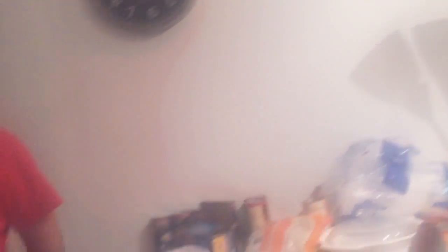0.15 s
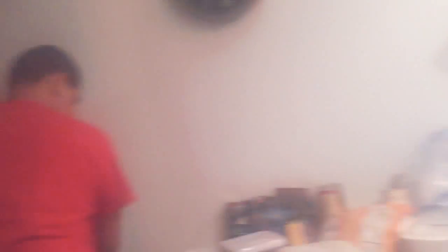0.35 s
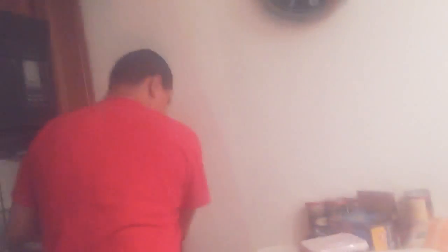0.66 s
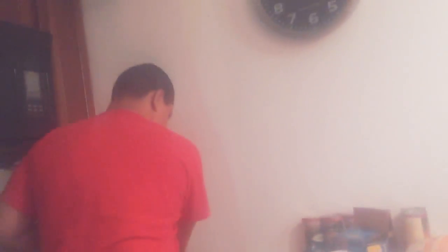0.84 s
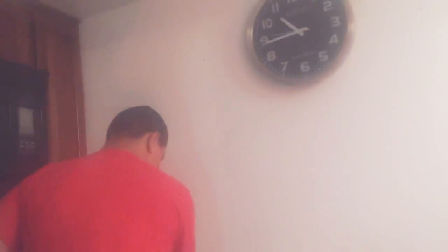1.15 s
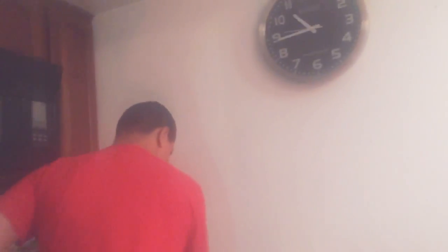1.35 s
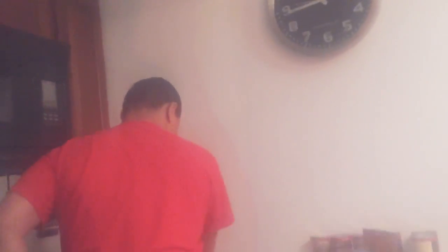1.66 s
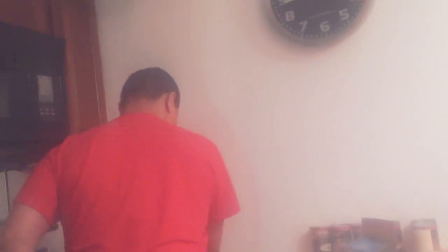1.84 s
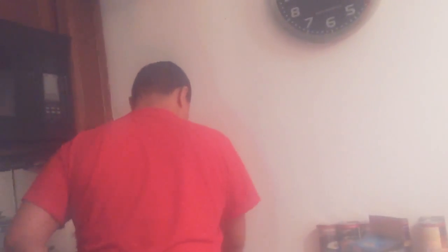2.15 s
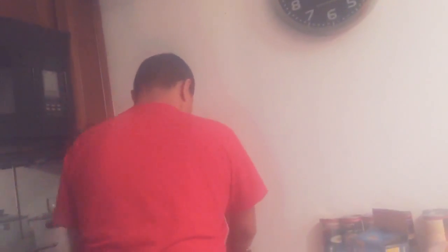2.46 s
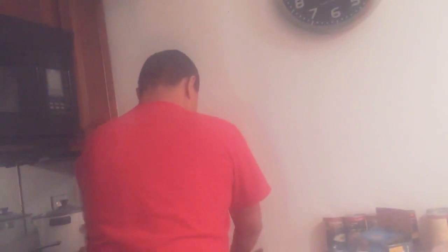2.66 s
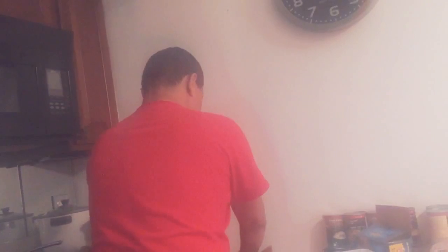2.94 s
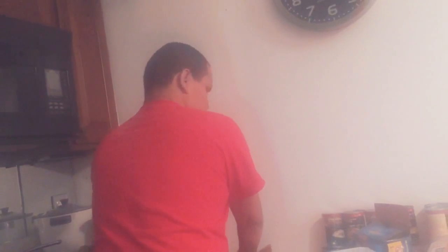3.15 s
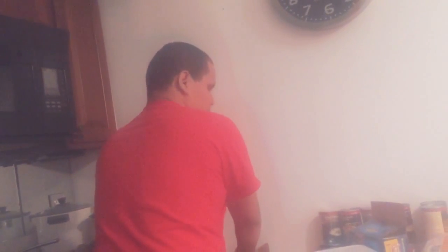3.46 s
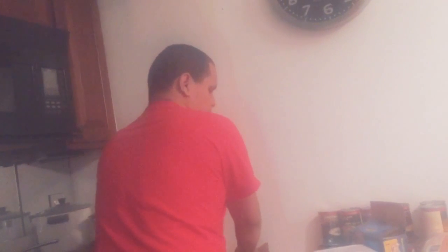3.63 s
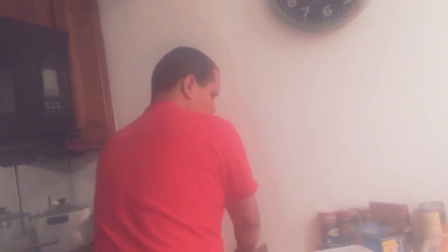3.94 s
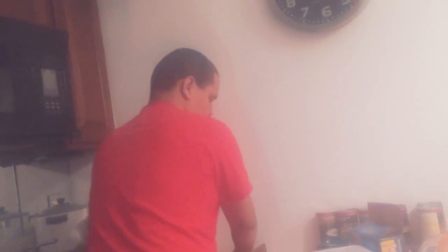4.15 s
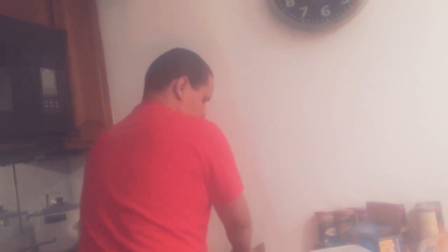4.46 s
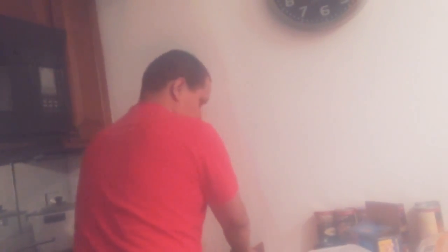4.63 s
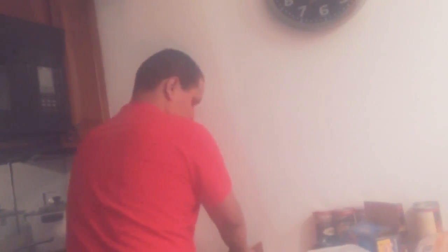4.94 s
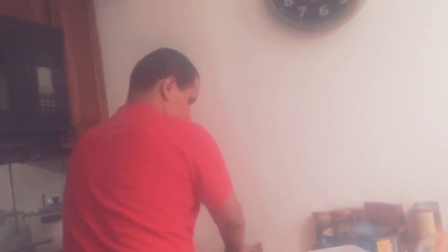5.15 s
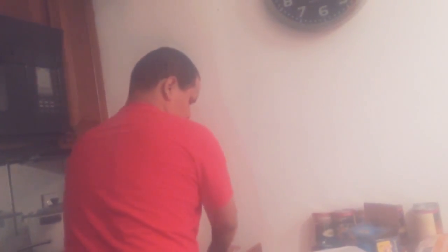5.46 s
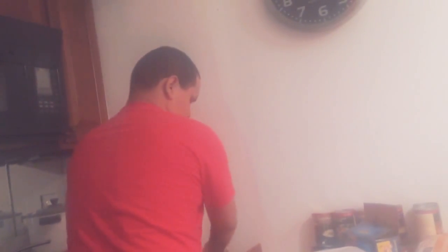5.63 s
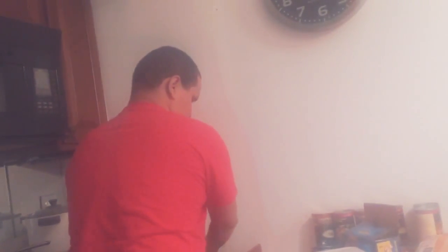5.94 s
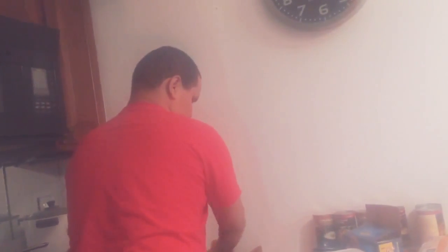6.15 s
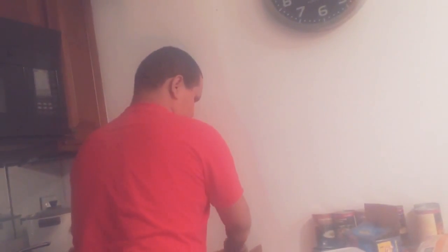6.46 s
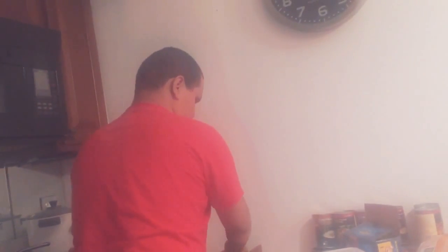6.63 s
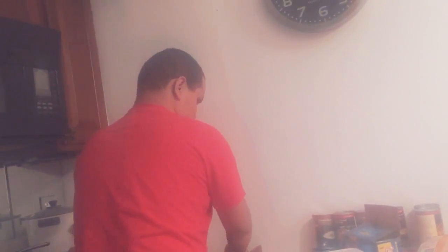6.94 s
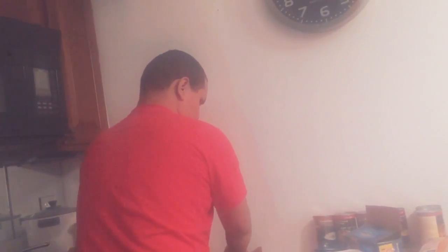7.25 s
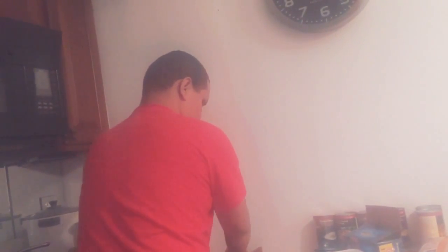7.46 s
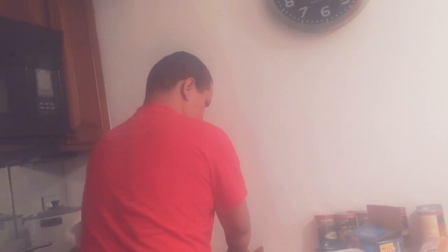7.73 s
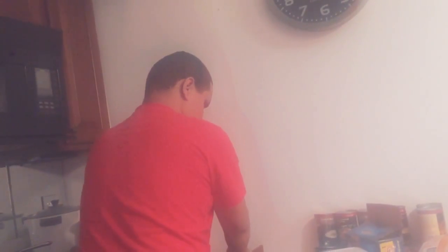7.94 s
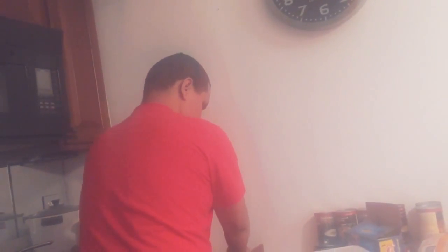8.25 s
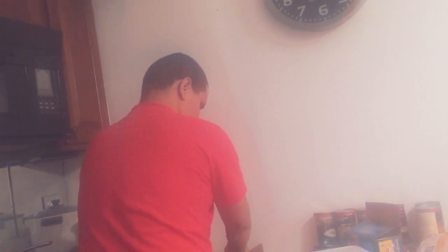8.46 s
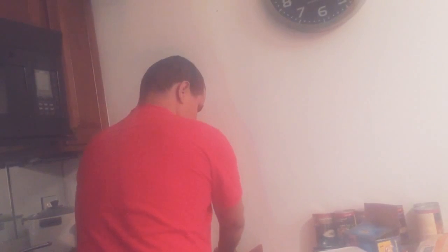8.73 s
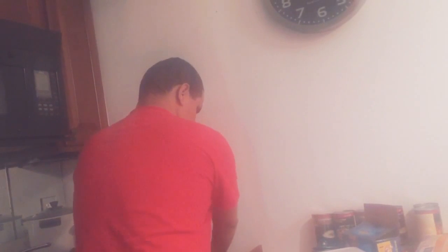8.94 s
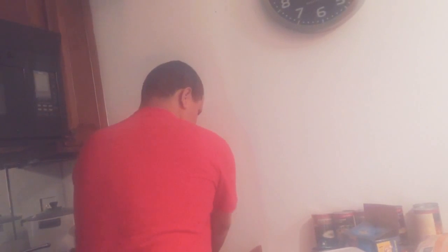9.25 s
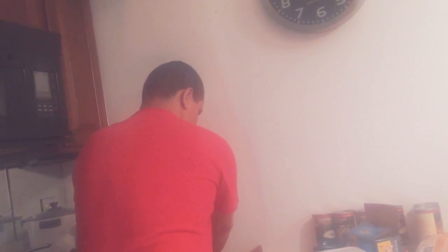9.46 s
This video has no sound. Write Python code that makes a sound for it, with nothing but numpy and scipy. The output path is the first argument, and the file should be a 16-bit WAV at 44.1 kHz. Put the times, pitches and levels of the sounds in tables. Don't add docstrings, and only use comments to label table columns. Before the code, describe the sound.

A steady low refrigerator hum, soft room noise and faint microphone hiss fill a small hard kitchen, with occasional tiny dry ticks. For the first 3 seconds there are only faint metallic touches and dull taps, including a soft flat landing at 1.35. At 3.0 a heavier woody thump with a short rattle lands, then clinks; a sharp knock at 3.6 leads to a bright, ringing steel clatter around 3.85-4.1, strongest at 3.94. Another quick cluster of knife knocks runs from 4.4 to 4.75. From 5 to 7.2 it is nearly quiet, with light touches near 5.9. Handling resumes at 7.2; the loudest crash, bright and singing, comes at 7.55-7.65. Rattles and blows continue to 8.25, with a low thud at 8.43, then hard, duller slams and clanks at 8.85-9.0. Small taps finish near 9.5. Echoes are brief.

```python
import sys
import numpy as np
from scipy import signal
from scipy.fft import rfft, irfft
from scipy.io import wavfile
from scipy.ndimage import uniform_filter1d, map_coordinates

SR = 44100
rng = np.random.default_rng(int(sys.argv[2]) if len(sys.argv) > 2 else 0)


def invert_db(x):
    u = np.asarray(x, float) / 20
    return 10 ** u


def wav_out(sig):
    wavfile.write(sys.argv[1], SR, np.round(np.clip(np.atleast_2d(sig).T, -1, 1) * 32767).astype(np.int16))


N = 422919
SPAN = 16384

# [t/s, peak level/dB, worktop knock/dB, treble/dB]
SNAPS = [(.922, -51, -1, -33), (4.455, -43, -4, -12), (4.555, -35.5, 0.5, -10), (4.77, -55, -7, -12),
         (1.5075, -50, -16, -12), (2.1131, -42, 0, -39), (2.2955, -37.5, -7, -34),
         (2.3684, -46.5, -0.5, -21), (3.084, -32, -3.5, -8), (3.182, -32.5, -4.5, -10),
         (3.2376, -40, 3.5, -17), (4.988, -54, 5, -17), (5.943, -41, 1, -21), (6.0044, -40, -2.5, -22),
         (7.4075, -28.5, 4.5, -29), (7.616, -16.5, -19, -1.5), (7.6494, -26, -12, -10.5),
         (7.839, -31, -4, -13), (8.37, -52, 18, -31), (8.8733, -30, -8, -12.5), (9.371, -48, 17.5, -26),
         (9.4894, -53.5, 15, -38)]
TOUCHES = [(.7063, -51.5, -7, -18), (1.8983, -43.5, -3.5, -6.5), (2.0238, -49, -2, -25),
           (2.7894, -51, 3, -24), (2.9314, -44, -2, -32), (3.4623, -41, 0, -19), (3.767, -36.5, -1, -19),
           (4.385, -49, -2, -15), (4.917, -67, 25.5, -26), (4.962, -39, 8.5, -28), (5.868, -34.5, 0, -26),
           (7.225, -43.5, 3.5, -15), (7.257, -38.5, 0.5, -10), (8.2594, -43, -7, -16),
           (8.386, -45, 12.5, -19), (8.419, -56, 22, -28), (8.617, -55.5, -8, -18),
           (8.6467, -45.5, -19, -41), (8.72, -45, 10, -17), (8.808, -38, 4, -24), (9.039, -46, -7, -28),
           (9.285, -53.5, -10, -4.5), (9.345, -38, -5, -18.5), (9.452, -36.5, -6, -17)]
BLOWS = [(3.5805, -20.5, -1, -2), (3.8446, -26.5, -5.5, -10.5), (3.9383, -13, -7, -2),
         (3.9875, -23, 1, -5.5), (4.408, -29.5, -6, -12), (4.424, -26, -5, -7), (4.4956, -24, -1.5, -4),
         (4.6617, -24.5, -2.5, -5.5), (4.7057, -31, 3, -14), (7.3693, -20.5, -1.5, -9.5),
         (7.562, -10.5, -5.5, -7), (7.5899, -10.5, -7, -5), (7.959, -35, -2, -16),
         (8.0147, -26.5, -3.5, -8), (8.064, -18, -3.5, -13), (8.149, -21, -3, -12.5),
         (8.947, -19, -3.5, -21)]
RATTLES = [(3.045, -25.5, 0, -11), (3.52, -45, 4.5, -15), (3.5564, -44, 10, -22), (3.6244, -37.5, 6, -27),
           (3.8723, -23, -2.5, -4), (3.911, -21, 2, -7), (4.0262, -26.5, 1.5, -3.5), (4.0644, -31, -4, -5),
           (4.476, -35, -0.5, -1), (4.6047, -39, 4.5, 2), (5.219, -57.5, 9, -13.5), (7.3425, -28, -1, -16),
           (7.534, -29, 0, -3), (7.548, -19, -4, -4), (7.7325, -22.5, -3, -7.5), (7.786, -30.5, -2, -7),
           (7.9494, -25.5, 0, -10), (8.184, -19.5, -5, -12.5), (8.2258, -21, 2, -16.5),
           (8.8494, -36, 4, -16), (8.493, -49.5, 5.5, -42), (8.755, -58, 16, -26)]
SLAMS = [
    (1.3525, -36.5, 2, -13),
    (3.021, -31, 8.6, -24),
    (8.9045, -19.5, 3.8, -19),
    (8.99, -23.5, 2.2, -16),
]

# [chatter length/s, rise/s, deep knock over knock/dB]
SNAP_HABITS = (0.028, .0018, -6)
TOUCH_HABITS = (0.055, 0.0023, -1.7)
BLOW_HABITS = (0.059, 0.0056, -9.5)
RATTLE_HABITS = (0.071, 0.0062, -4.5)
SLAM_HABITS = (.055, 0.00086, -5.5)

# [f/Hz, width/Hz, level/dB]
BLADES = [(2660, 37, -2.5), (2960, 16, -1.5), (3826, 64, -3), (4250, 29, 4), (4660, 240, 2.5),
          (5640, 110, 11), (6580, 65, -1), (7200, 60, 9.5), (8590, 55, 3), (9370, 100, 14.5),
          (10000, 66, -1), (11140, 130, 12.5), (11880, 160, 7), (12720, 110, 10.5), (13300, 26.6, 0),
          (13600, 110, 11.5), (14700, 120, 3), (15100, 33, 1), (15500, 15, -16.5)]
# [f/Hz, width/Hz, level/dB]
WORKTOP = [(607, 37, -3.5), (780, 8.2, 1.5), (875, 54, -3.5), (937, 35, 9), (1200, 140, 1), (1210, 310, 7),
           (1376, 20, -0.5), (1523, 23, 0.5), (1684, 300, 9), (1736, 20, 3), (1850, 140, 6),
           (2123, 28, 1.5), (2540, 80, -5)]
# [f/Hz, level per Hz/dB]
KNOCK = [(120, -42), (200, -0.5), (462, 1), (609, 3), (812, 5.5), (1860, 0), (2690, -8.5), (3500, -25),
         (4550, -52), (7700, -120)]
# [f/Hz, level per Hz/dB]
SCRAPE = [(1200, -15.5), (2500, -1), (5000, -2), (8000, 3), (12000, 2.5), (16000, -5.5)]
# [f/Hz, t60/s]
ROOM_T60 = [(150, 0.16), (1000, 0.34), (4000, 0.36), (14000, 0.24)]

# [f/Hz, level/dB, t60/s]
PARING = [(9270, 0, .09), (10000, -7, .08), (11420, -1, .09), (12740, -4, .11), (13730, -5, .085),
          (14740, -15, .1)]
CARVING = [(4180, -2, 0.13), (5560, 0, .1), (7260, -2, .09)]
BUTTER = [(6680, -3.5, 0.083), (8580, 1, 0.09)]
# [t/s, peak level/dB, slope towards upper modes/dB per octave]
PARING_STRIKES = [(3.19, -64, 5), (3.471, -70, 0.5), (3.945, -22.5, 9), (4.422, -46.5, -30),
                  (4.498, -37, -10), (4.619, -52, 0.5), (4.71, -42.5, -6.5), (5.872, -69, 11),
                  (7.266, -62, 2), (7.39, -56, 5), (7.58, -21, 18), (7.618, -21.5, 21), (7.963, -46, -1),
                  (8.072, -38, -12), (8.194, -36, -8), (8.232, -41.5, 0.5), (8.33, -66, 0.5),
                  (8.917, -42.5, 11.5)]
CARVING_STRIKES = [(3.468, -56.5, 5), (3.637, -53, -14), (4.502, -35, 5), (4.607, -52, -10),
                   (4.967, -66, -8), (5.877, -49, -6), (7.601, -38.5, 22), (7.626, -37, -14),
                   (7.654, -46, 21), (8.25, -48, 6), (3.95, -37, -14.5)]
BUTTER_STRIKES = [
    (2.929, -71, -15),
    (3.52, -63, 15),
    (7.266, -56, -37.5),
    (7.419, -46, -32),
    (7.586, -27.5, 16),
    (7.627, -34, -23.5),
    (7.754, -39, 22),
    (8.019, -38, 3),
]
# [t/s, f/Hz, peak level/dB, t60/s]
NOTES = [(.71, 3850, -68, .1), (.928, 3850, -63, .05), (1.72, 1780, -58, .05), (1.83, 3250, -65, .05),
         (1.907, 1670, -47, .09), (2.21, 3750, -63, .07), (2.314, 1535, -47, .07), (3.588, 5580, -29, .085),
         (3.95, 15080, -37, .08), (3.955, 9400, -32, .12), (3.96, 11830, -35, .07), (3.96, 7260, -35, .15),
         (4.004, 1840, -27, .08), (4.062, 1840, -36, .17), (4.503, 970, -34, .08), (4.675, 7250, -43, .15),
         (4.74, 5560, -48, .1), (4.745, 4390, -48, .1), (5.88, 2540, -48, .05), (5.919, 1840, -48, .1),
         (7.232, 3120, -50, .08), (7.585, 7200, -31, .1), (7.589, 970, -19, .04), (7.595, 15080, -30, .13),
         (7.6, 10630, -37, .1), (7.65, 2680, -38, .06), (7.736, 965, -29, .088), (7.977, 1794, -37, .09),
         (8.02, 4830, -44, .06), (8.075, 5550, -38, .1), (8.23, 3900, -42, .12), (8.235, 4830, -39, .1),
         (8.24, 5580, -42, .17), (8.743, 860, -41, .12), (8.915, 5590, -37, .19), (8.92, 4230, -39, .25),
         (8.92, 7250, -46, .1), (8.995, 5590, -43, .2), (9.04, 1850, -37, .1), (9.476, 3260, -49, .075)]
# [t/s, f/Hz, width/Hz, peak level/dB, length/s]
CLANKS = [(1.354, 1260, 200, -36.5, 0.028), (1.356, 6200, 900, -43.5, 0.046),
          (1.356, 2600, 600, -49.5, .045), (1.862, 380, 120, -44, .05), (1.904, 2300, 500, -51.5, .025),
          (3.916, 800, 250, -30.5, .08), (4.029, 810, 250, -35, .08), (7.564, 2280, 400, -32, .06),
          (3.023, 1450, 250, -23.5, 0.029), (3.471, 1450, 200, -42.5, 0.035),
          (3.59, 1770, 300, -30.5, 0.064), (3.772, 1200, 250, -37, 0.033), (3.93, 4900, 1400, -32.5, .025),
          (4.425, 1730, 300, -33, 0.058), (4.535, 1610, 400, -32.5, .04), (4.64, 1500, 500, -36.5, .03),
          (4.668, 4100, 400, -37.5, .04), (4.67, 1900, 300, -34, 0.053), (4.71, 1400, 300, -37, .04),
          (5.872, 2480, 503, -41, 0.051), (5.872, 680, 100, -41, 0.047), (5.948, 3300, 500, -50.5, 0.027),
          (7.41, 1060, 200, -28.5, 0.028), (7.553, 1240, 250, -24, 0.053), (7.585, 1220, 150, -23, .06),
          (7.62, 1660, 150, -26, 0.05), (8.068, 2620, 500, -35, 0.028), (8.07, 945, 150, -34, .05),
          (8.157, 780, 200, -28, 0.038), (8.232, 1240, 400, -33, 0.048), (8.372, 850, 300, -37, .04),
          (8.42, 600, 200, -33.5, 0.055), (8.724, 586, 200, -39, 0.07), (8.906, 1430, 250, -24, .04),
          (8.908, 588, 110, -27, 0.089), (8.95, 654, 150, -29.5, 0.066), (8.993, 1850, 200, -29, 0.076),
          (9.373, 1480, 500, -47, .03), (9.458, 1500, 600, -41.5, .03), (8.995, 13500, 2500, -43, .05)]
# [t/s, peak level/dB, floor boom/dB]
THUDS = [(1.06, -62, 9), (1.148, -59, 8), (1.9, -64, 13), (9.5, -53.5, 9), (1.351, -33, -40),
         (3.023, -23, -8.5), (3.058, -29.5, -8), (3.938, -23.5, -21), (4.501, -28, -24), (7.588, -22, -29),
         (8.228, -19.5, -47), (8.426, -25.5, -50), (8.848, -40, -7), (8.906, -37, -32), (8.986, -23, -25)]

# [f/Hz, rms level/dB]
HUM = [(118.4, -58.5), (155.3, -45.5), (233, -60.5), (342, -69), (646, -67), (705, -73), (823, -73),
       (975, -73.5)]
# [f/Hz, level per Hz/dB]
AIR = [(20, -53), (45, -23.5), (75, -23.5), (100, -16), (125, -8), (175, -6.5), (205, -14.5), (240, -12),
       (340, -13.5), (420, -22), (650, -23.5), (1750, -27.5), (2640, -44.5), (16300, -58.5)]
# [t/s, level/dB]
STIR = [
    (0, 0.5),
    (4.73, 2),
    (5.05, -0.3),
    (7.18, -0.5),
    (7.58, 11),
    (9.59, 0.8),
]
CALM_DB = (-66.5, -51, -60.5, -71.5)
FOLLOWS = (.2, 0.24, 0.91, 1.1)
# [f/Hz, width/Hz, level/dB]
PORT = [(4900, 370, -3.5), (7700, 510, -2.5), (10570, 820, -2.5)]
# [t/s, peak level/dB]
TICKS = [(0.0453, -52), (0.9759, -40), (1.4252, -68), (1.6674, -56), (2.1495, -52), (2.357, -36),
         (2.8389, -40), (3.288, -40), (4.9087, -48), (5.3567, -48), (5.8404, -56.5), (6.289, -39),
         (6.771, -56), (6.977, -50), (7.1089, -44), (7.2199, -41), (8.3919, -29), (8.8414, -53),
         (9.5302, -47.5)]


def unit(x):
    return x / np.sqrt(np.mean(x ** 2) + 1e-20)


def even(response):
    return response / np.sqrt(np.mean(np.abs(response) ** 2))


def along(points, hz):
    f, value = np.transpose(points)
    return np.interp(np.log(hz + 1), np.log(f + 1), value)


def wobble(rate):
    knots = rng.standard_normal(int(N * rate / SR) + 4)
    return map_coordinates(knots, [np.arange(N) * rate / SR])


def add(track, s, sound):
    track[round(s * SR):][:len(sound)] += sound


def modes(table, hz, narrow, scatter_db):
    centre, width, db = np.transpose(table)[:, :, None]
    rank = np.argsort(np.argsort(centre, axis=0), axis=0)
    gain = invert_db(db + scatter_db * rng.standard_normal(centre.shape)) * (-1.) ** rank
    width = np.abs(width * narrow) + 1
    resonance = 1j * hz * np.sqrt(width) / (centre * centre - hz * hz + 1j * hz * width)
    return np.sum(gain * resonance, axis=0)


def chatter(length, rise, lump_db=2.5):
    t = np.arange(SPAN) / SR
    lumps = np.repeat(rng.standard_normal(SPAN // 64), 64)
    swell = 1 - np.exp(-t / np.clip(rise, .0003, .04))
    shape = swell * invert_db(-20 * t / np.clip(length, .003, .15) + lump_db * lumps)
    return shape * rng.standard_normal(SPAN) * (t < .3)


def room_tail(hz):
    f, t, z = signal.stft(rng.standard_normal(SPAN - 4096), SR, nperseg=256)
    decay = invert_db(-60 * t / along(ROOM_T60, f)[:, None])
    tail = signal.istft(z * decay, SR, nperseg=256)[1]
    return rfft(tail / np.linalg.norm(tail), 2 * SPAN) * np.exp(-2j * np.pi * hz * .006)


def contacts():
    kinds = [(SNAPS, SNAP_HABITS), (TOUCHES, TOUCH_HABITS), (BLOWS, BLOW_HABITS),
             (RATTLES, RATTLE_HABITS), (SLAMS, SLAM_HABITS)]
    return sorted((*row, *habits) for rows, habits in kinds for row in rows)


def steel_response(hz, treble_db):
    tilt = invert_db(along([(4000, 0.014), (11000, treble_db)], hz))
    scrape = even(invert_db(along(SCRAPE, hz)))
    held = np.array(BLADES) * [1 + 0.0031 * rng.standard_normal(), 1, 1]
    blades = even(modes(held, hz, narrow=1.2, scatter_db=2))
    others = rng.uniform([1950, 30, -8], [9000, 100, 0], (30, 3))
    pile = even(modes(others, hz, narrow=1, scatter_db=1.5))
    return tilt * (invert_db(-4.0) * scrape + invert_db(-2) * blades + invert_db(-10) * pile)


def wood_response(hz, knock_db, deep_db):
    soft = 1 / (1 + 1j * hz / 3000) ** 3 * (1j * hz / (200 + 1j * hz)) ** 2
    top = even(soft * modes(WORKTOP, hz, narrow=1.2, scatter_db=1.5))
    wood = top + 1.2 * even(invert_db(along(KNOCK, hz)))
    weight = invert_db(along([(750, knock_db + deep_db + 4.5), (1050, knock_db)], hz))
    return invert_db(-4.5) * weight * wood


def knives():
    out, hz = np.zeros(N + 2 * SPAN), np.fft.rfftfreq(2 * SPAN, 1 / SR)
    for s, db, knock_db, treble_db, length, rise, deep_db in contacts():
        steel = rfft(chatter(length, rise), 2 * SPAN) * steel_response(hz, treble_db)
        push = chatter(1.2 * length, 1.1 * rise, lump_db=2.8)
        knock = rfft(push, 2 * SPAN) * wood_response(hz, knock_db, deep_db)
        room = 1 + invert_db(-9.0) * room_tail(hz)
        add(out, s, invert_db(db - 2.0) * irfft((steel + knock) * room))
    return out[:N]


def singing():
    struck = []
    for knife, strikes in [(PARING, PARING_STRIKES), (CARVING, CARVING_STRIKES), (BUTTER, BUTTER_STRIKES)]:
        middle_hz = np.mean([hz for hz, _, _ in knife])
        for s, db, slope in strikes:
            for hz, mode_db, t60 in knife:
                detune = 1 + .003 * rng.standard_normal() * (hz > 9000)
                uneven_db = 2 * rng.standard_normal()
                level_db = db + mode_db + slope * np.log2(hz / middle_hz) + uneven_db
                struck.append((s, hz * detune, level_db, t60))
    return struck + list(NOTES)


def rings():
    out, t = np.zeros(N + 2 * SPAN), np.arange(SPAN) / SR
    for s, ring_hz, db, t60 in singing():
        level, phase = (map_coordinates(rng.standard_normal(60), [t * 120]) for _ in range(2))
        fade_db = -60 * (t / np.clip(1.3 * t60, .03, .25)) ** 1.15
        envelope = invert_db(db + 1.5 + fade_db + 2.5 * level) * (1 - np.exp(-t / .003))
        add(out, s, envelope * np.sin(2 * np.pi * ring_hz * t + 1.3 * phase))
    tail = irfft(room_tail(np.fft.rfftfreq(2 * SPAN, 1 / SR)))
    return out[:N] + invert_db(-10.5) * signal.fftconvolve(out, tail)[:N]


def clanks():
    out, hz = np.zeros(N + 2 * SPAN), np.fft.rfftfreq(2 * SPAN, 1 / SR)
    for s, clank_hz, width, db, length in CLANKS:
        body = (1j * hz * width / (clank_hz ** 2 - hz * hz + 1j * hz * width)) ** 2
        rattle = rfft(chatter(length, rise=0.0013), 2 * SPAN)
        room = 1 + invert_db(-9.5) * room_tail(hz)
        add(out, s, invert_db(db) * irfft(rattle * even(body) * room))
    return out[:N]


def thuds():
    out, hz = np.zeros(N + 2 * SPAN), np.fft.rfftfreq(SPAN, 1 / SR)
    panels = [(170, 40, 0), (260, 50, -2), (340, 60, -2), (450, 60, -4)]  # f/Hz, width/Hz, level/dB
    for s, db, boom_db in THUDS:
        cabinet = even(modes(panels, hz, narrow=1, scatter_db=2.5))
        floor = even(modes([(72, 18, 0)], hz, narrow=1, scatter_db=0) * 1j * hz / (45 + 1j * hz))
        push = rfft(chatter(0.046, rise=0.012))
        add(out, s, invert_db(db - 2.5) * irfft(push * (cabinet + invert_db(boom_db + 9) * floor)))
    return out[:N]


def fridge():
    t, out = np.arange(N) / SR, np.zeros(N)
    top_db = max(db for _, db in HUM)
    for hz, db in HUM:
        flutter_db = (-0.25 + 0.16 * (top_db - db)) * wobble(9.7)
        drift = (.8 + hz / 700) * wobble(3.7)
        out += invert_db(db + 4 + flutter_db) * np.sin(2 * np.pi * hz * t + drift)
    return out


def patchy(depth_db):
    z = signal.stft(rng.standard_normal(N + 8192), nperseg=512)[2]
    field = uniform_filter1d(rng.standard_normal(z.shape), 4, axis=0)
    field = uniform_filter1d(field, 7, axis=1)
    return signal.istft(z * invert_db(depth_db * unit(field)), nperseg=512)[1][:N + 8192]


def air():
    s, stir_db = np.transpose(STIR)
    movement_db = np.interp(np.arange(N) / SR, s, stir_db)
    hz, out = np.fft.rfftfreq(N + 8192, 1 / SR), np.zeros(N)
    port_db = sum(db * np.exp(-((hz - c) / w) ** 2) for c, w, db in PORT)
    regions = [[(90, 1), (110, 0)],  # f/Hz, share of power
               [(90, 0), (110, 1), (400, 1), (600, 0)],
               [(400, 0), (600, 1), (2200, 1), (3000, 0)],
               [(2200, 0), (3000, 1)]]
    gusts_db, patches_db = (2.5, 1.5, 1.2, .6), (2, 2, 2, .9)
    for region, db, share, gust_db, patch_db in zip(regions, CALM_DB, FOLLOWS, gusts_db, patches_db):
        colour = invert_db(along(AIR, hz) + port_db) * np.sqrt(along(region, hz))
        noise = irfft(rfft(patchy(patch_db)) * colour, N + 8192)[:N]
        out += invert_db(db + share * movement_db + gust_db * wobble(12)) * unit(noise)
    return out


def scene():
    return (knives() + rings() + clanks() + thuds() + fridge() + air())[None]


def top_cut(x):
    return signal.sosfilt(signal.butter(12, 16480, fs=SR, output="sos"), x)


def record(dry):
    x = dry / (1 + np.abs(dry / .6) ** 4) ** (1 / 4)
    edge = np.clip((15850 - np.fft.rfftfreq(N, 1 / SR)) / 250, 0, 1)
    x = irfft(rfft(x) * edge ** 2, N)
    s, db = np.transpose(TICKS)
    ticks = np.bincount((s * SR).astype(int), invert_db(db - 1), N)
    mix = x + ticks - uniform_filter1d(ticks, size=9)
    return top_cut(mix)


dry = scene()
out = record(dry)
wav_out(out)
```